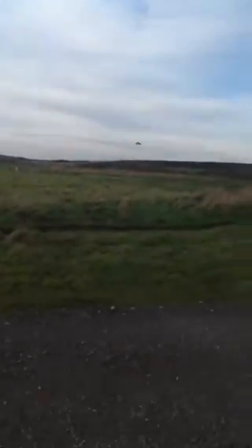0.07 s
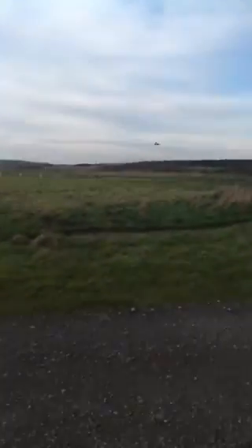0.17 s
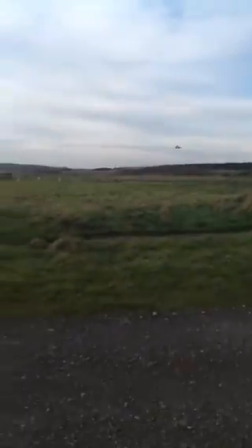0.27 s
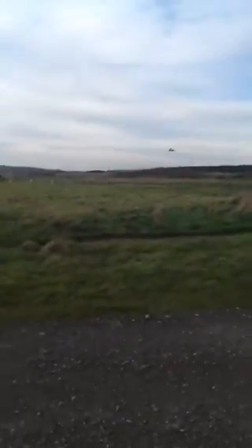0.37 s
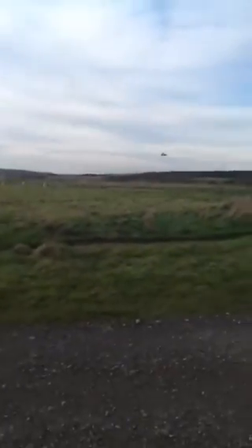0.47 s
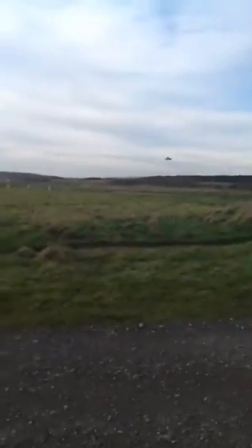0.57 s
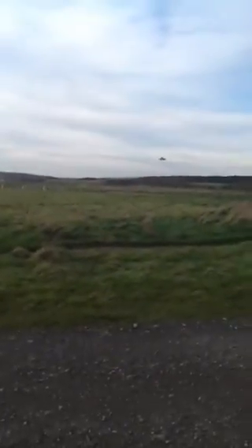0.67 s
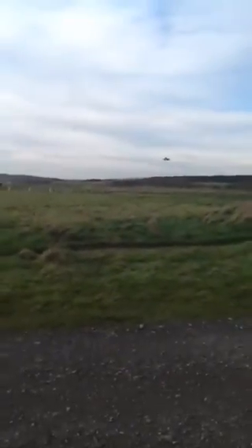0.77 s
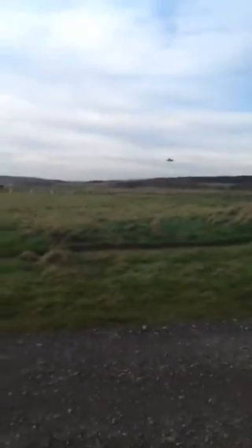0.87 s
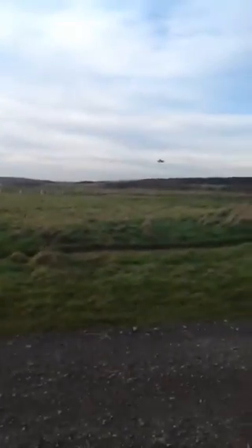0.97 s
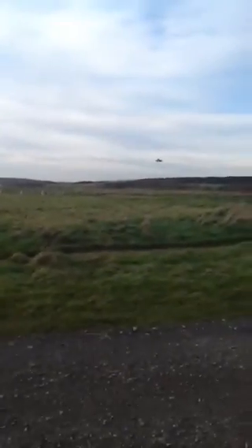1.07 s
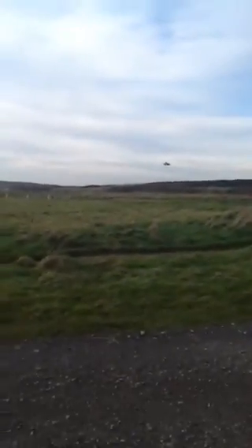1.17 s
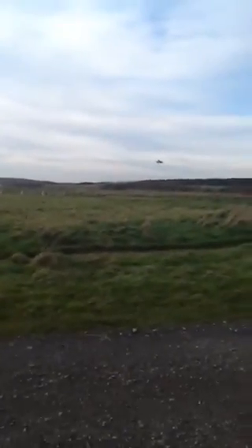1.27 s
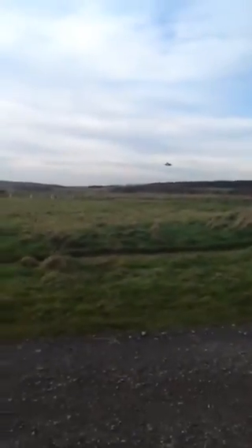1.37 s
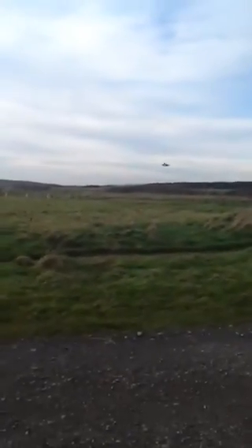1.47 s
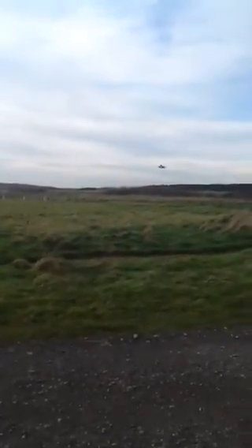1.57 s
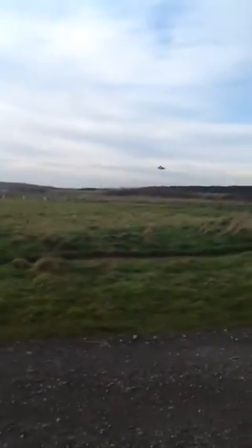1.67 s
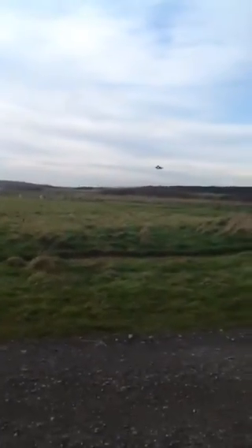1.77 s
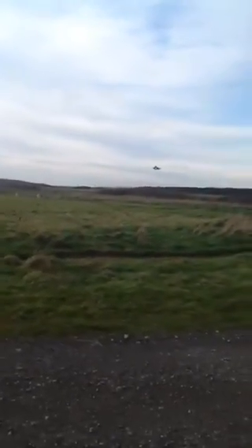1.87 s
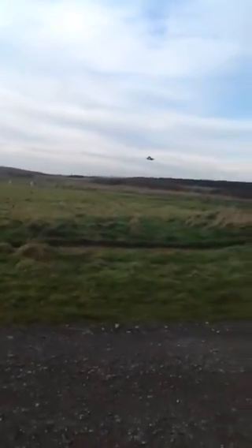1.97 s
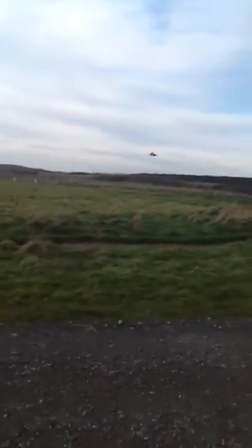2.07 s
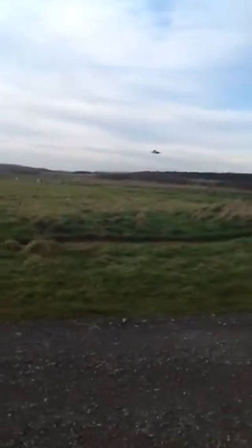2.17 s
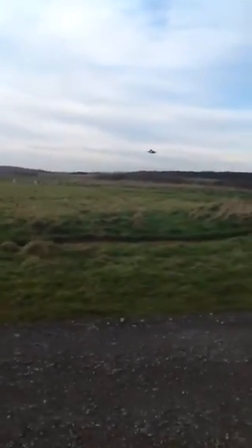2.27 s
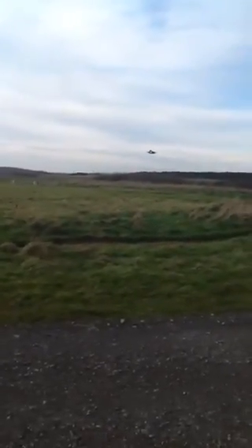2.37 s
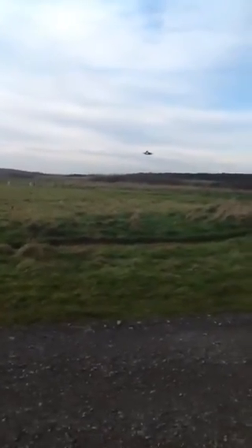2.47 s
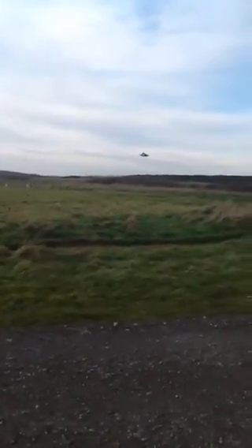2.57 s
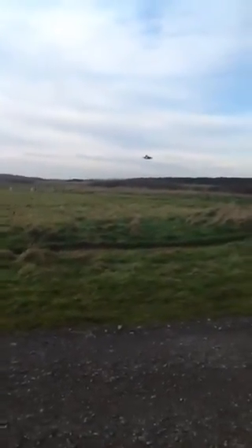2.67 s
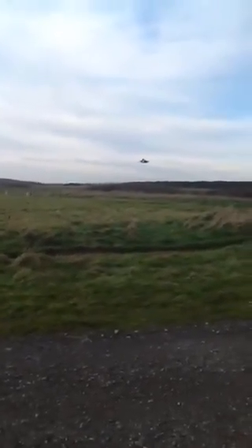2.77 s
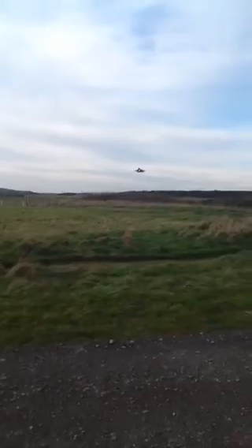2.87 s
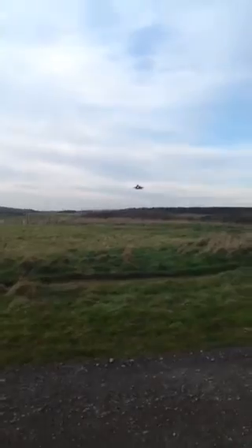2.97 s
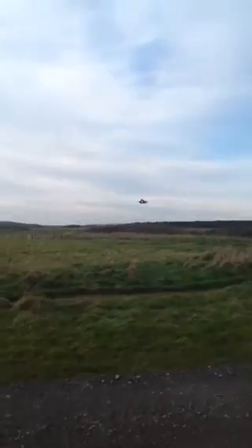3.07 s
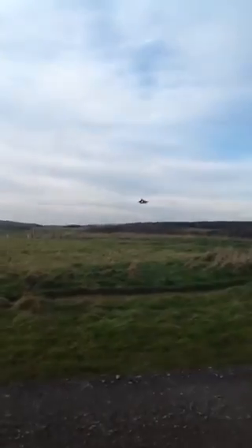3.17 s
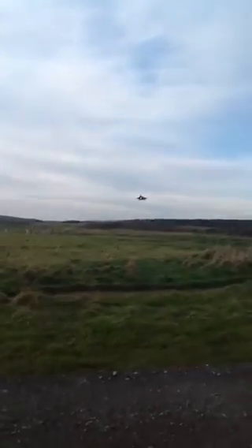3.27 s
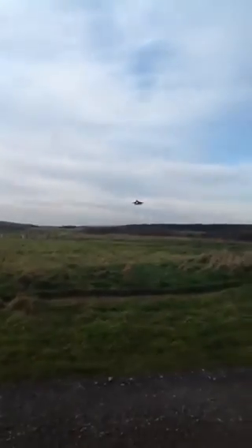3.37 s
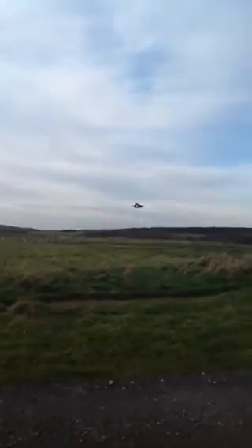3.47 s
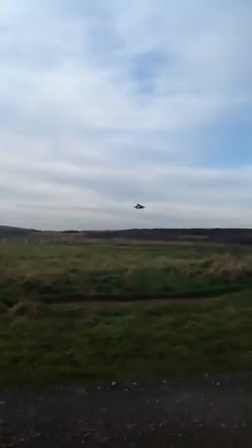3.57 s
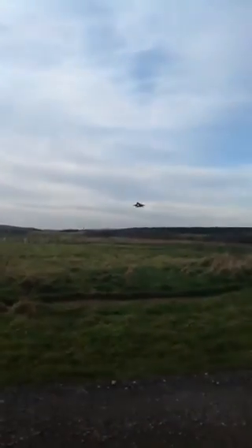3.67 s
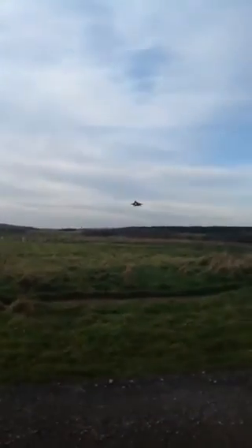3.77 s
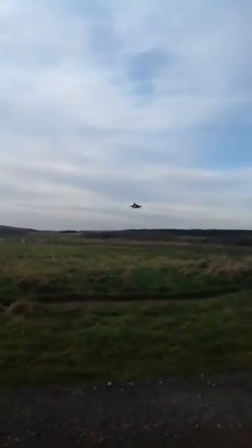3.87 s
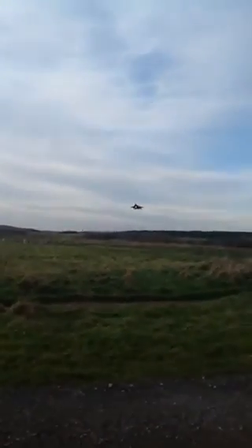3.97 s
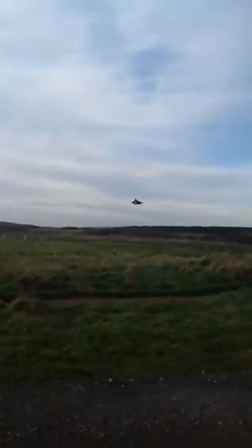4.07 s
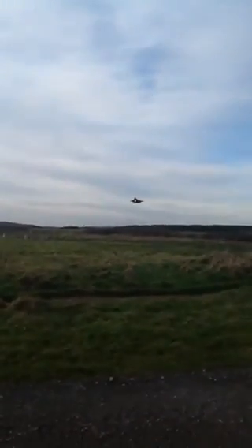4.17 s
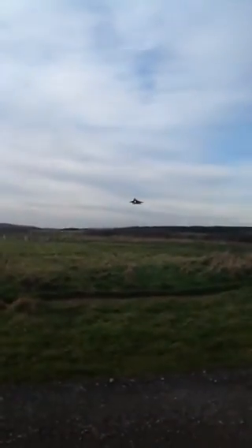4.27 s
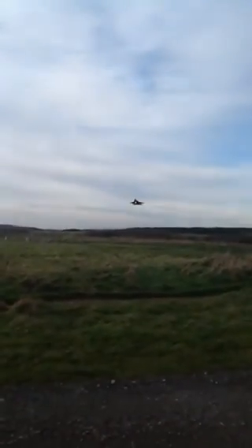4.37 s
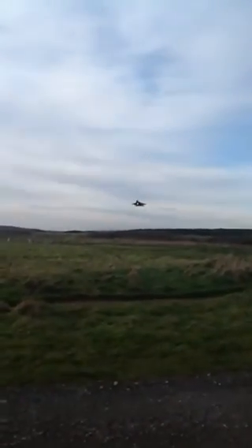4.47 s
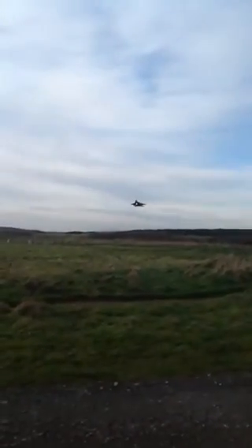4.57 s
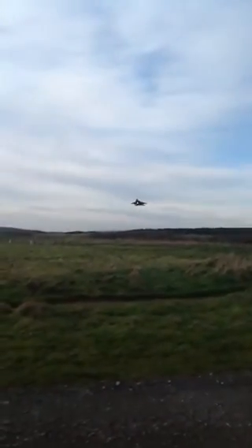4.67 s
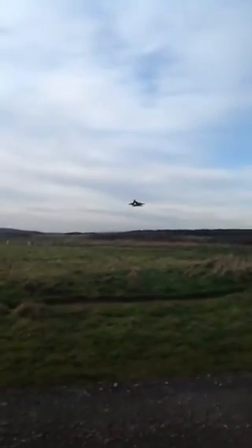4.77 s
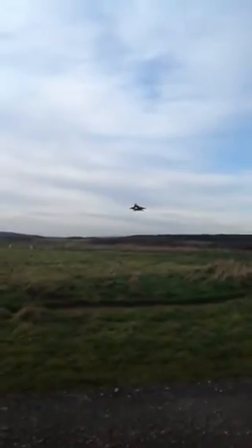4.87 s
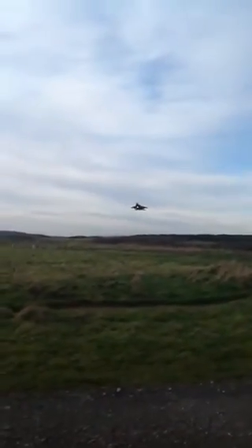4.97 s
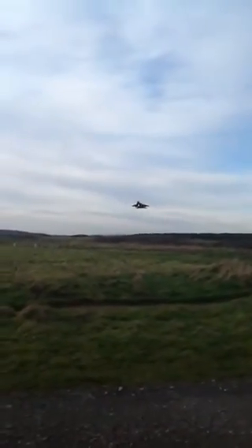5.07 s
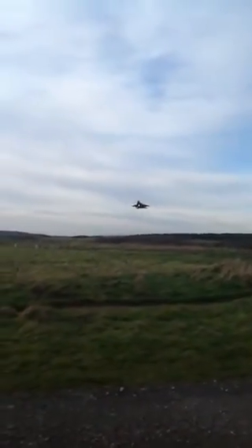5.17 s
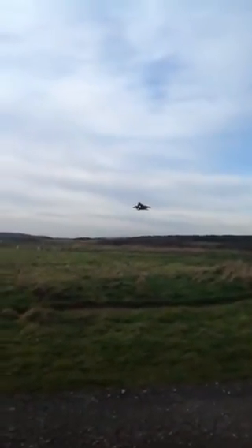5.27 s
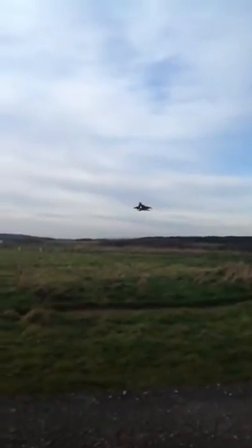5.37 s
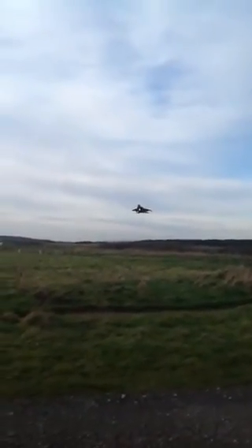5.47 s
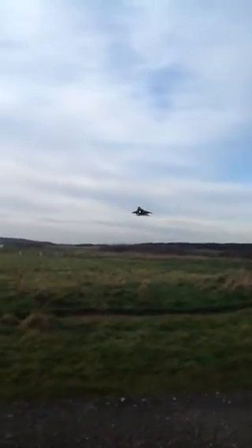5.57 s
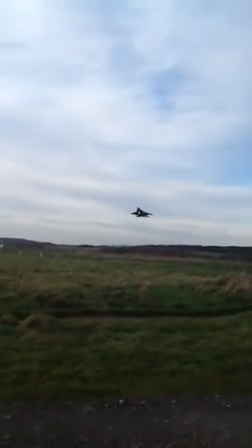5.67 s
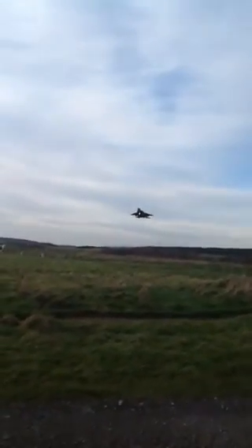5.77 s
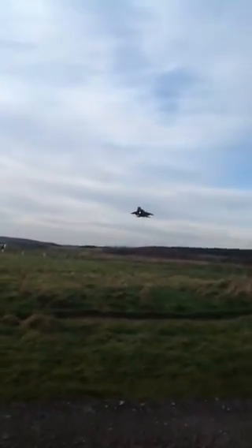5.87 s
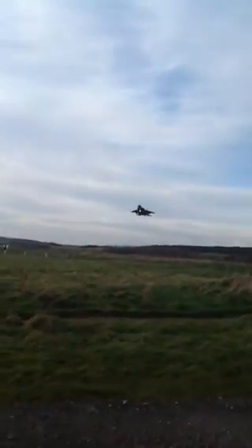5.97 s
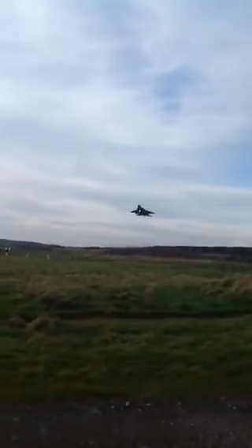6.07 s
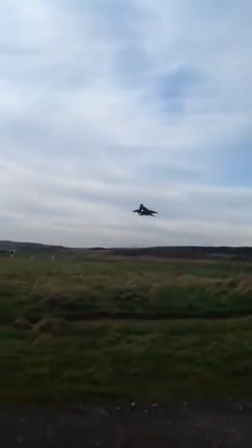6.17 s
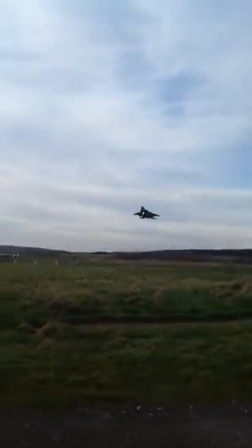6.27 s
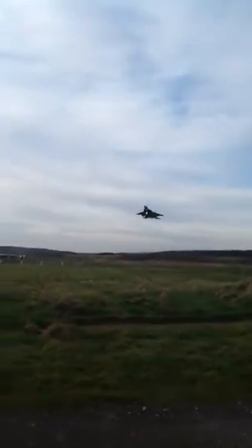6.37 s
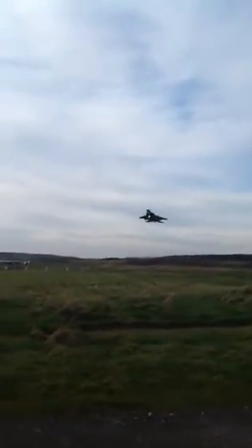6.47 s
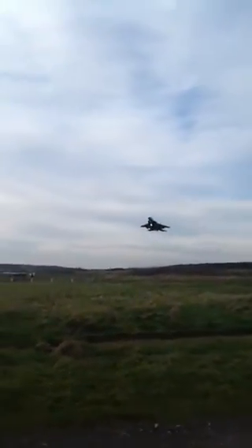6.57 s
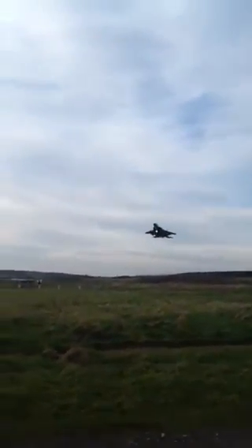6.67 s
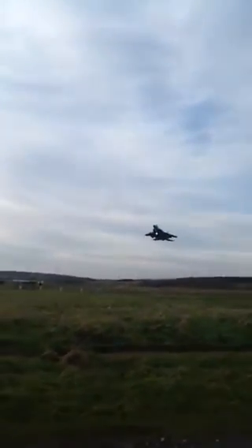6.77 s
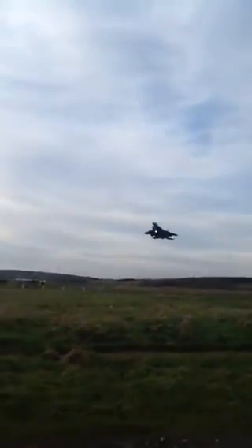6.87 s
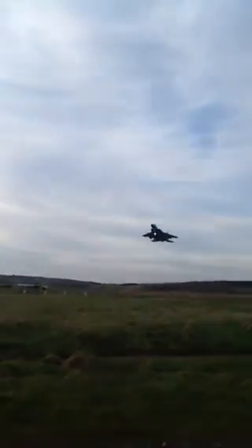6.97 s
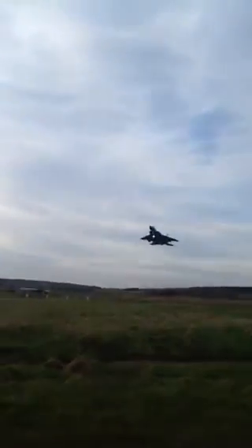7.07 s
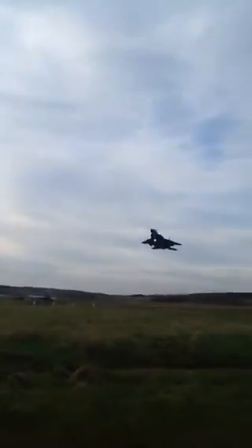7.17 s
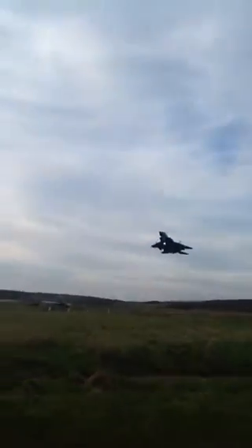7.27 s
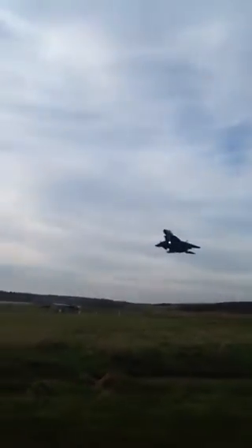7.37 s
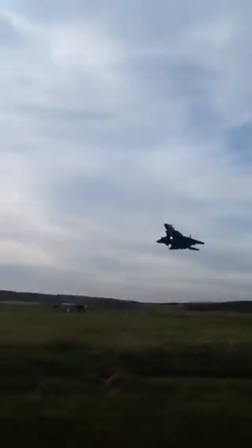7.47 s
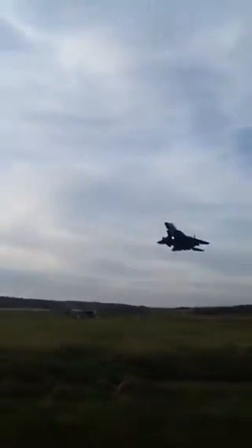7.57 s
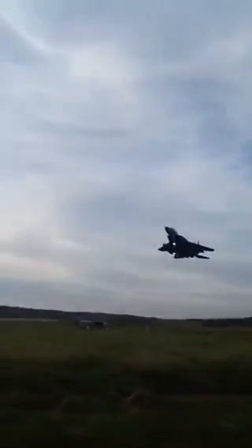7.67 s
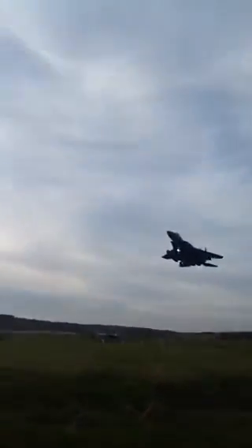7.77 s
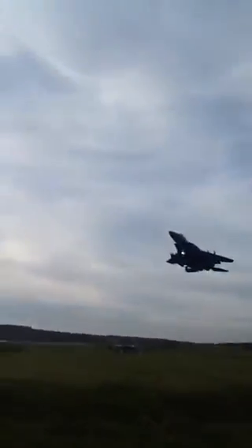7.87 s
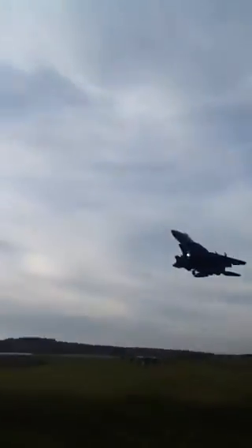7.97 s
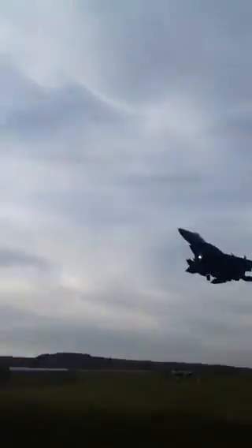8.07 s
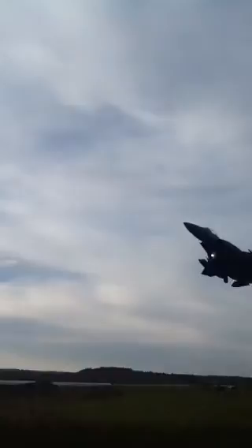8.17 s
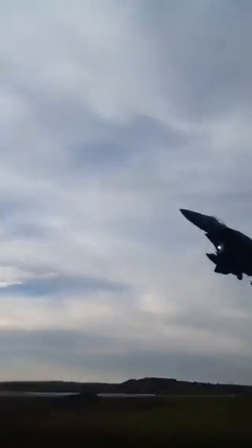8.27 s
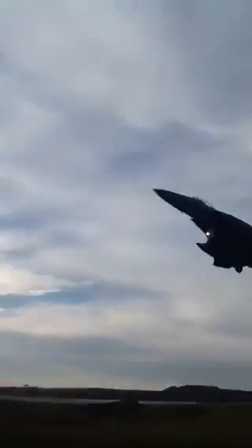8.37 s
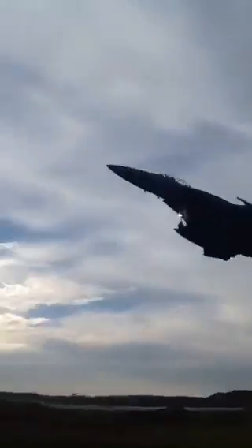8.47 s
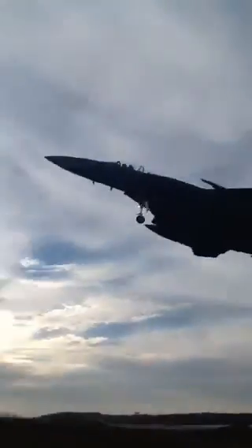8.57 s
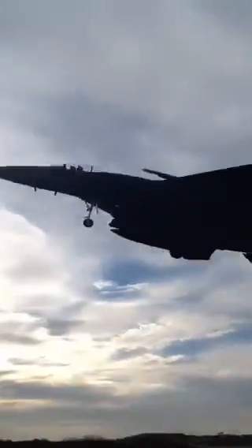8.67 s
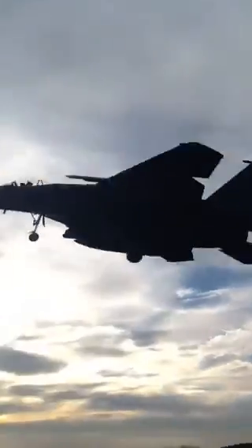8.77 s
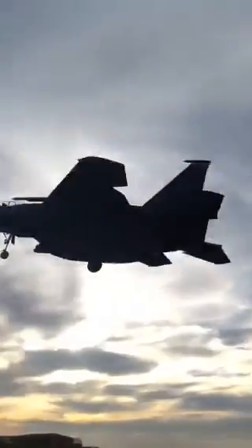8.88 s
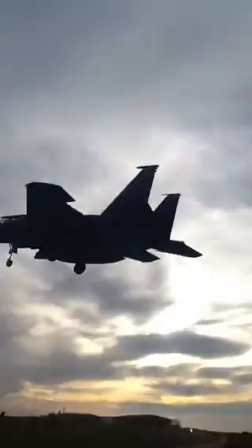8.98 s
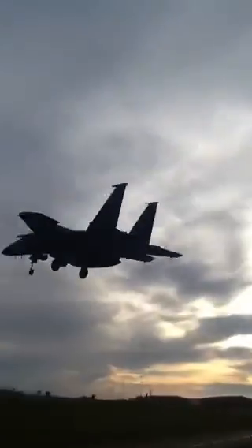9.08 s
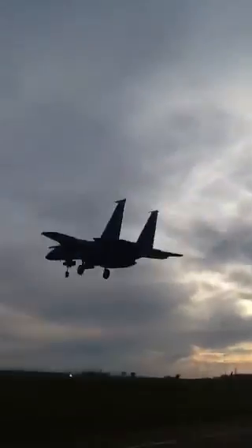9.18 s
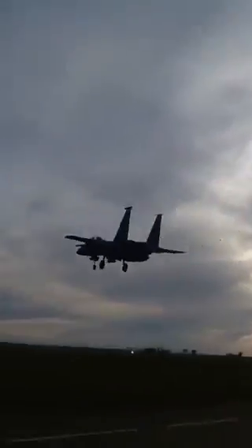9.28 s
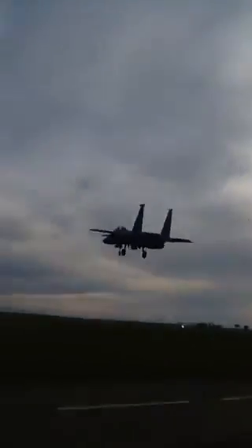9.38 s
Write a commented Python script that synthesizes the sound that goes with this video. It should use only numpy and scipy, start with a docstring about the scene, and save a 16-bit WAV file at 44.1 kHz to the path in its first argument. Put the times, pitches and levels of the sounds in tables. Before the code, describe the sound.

From the start, gusty wind buffets a phone microphone in an open field with irregular low thumps and puffs, strongest in the first three seconds. Underneath, a distant fighter jet makes a faint hiss and thin, high tones that flicker in and out. At about 4 seconds its roar begins to swell, fluttering unevenly, with a high fan whine on top. From 6 seconds the whine grows piercing and climbs slightly, and brief howls rise out of the noise. The roar surges at 7 seconds and stays loud, getting brighter with a faint sweeping, hollow colour, while the wind dies away before 8 seconds. Around 8.5 to 9 seconds the jet passes just overhead: the whine drops away into a broad hissing rush with quick falling howls. A deep exhaust rumble then dominates until the end, at about 9.5 seconds.

```python
"""Low jet over a windy field

A twin-engine jet comes in low and passes just above a phone held in a gusty wind.
From afar its compressor tones twinkle over a faint hiss; then fan whine and roar swell, and the
exhaust rumbles after. Wind buffets the single microphone with low thumps."""
import sys
import numpy as np
from scipy import signal
from scipy.fft import rfft, irfft, next_fast_len
from scipy.io import wavfile
from scipy.ndimage import uniform_filter1d, minimum_filter1d

SR = 44100
rng = np.random.default_rng(int(sys.argv[2]) if len(sys.argv) > 2 else 0)


def dump(signal):
    """Clip the signal to [-1, 1] and save it as 16-bit WAV at the path in sys.argv[1]."""
    limited = np.clip(np.atleast_2d(signal).T, -1, 1)
    pcm = np.round(limited * 32767).astype(np.int16)
    wavfile.write(sys.argv[1], SR, pcm)


N = 415848
TIME = np.arange(N) / SR
FRAME, HOP = 1024, 256


def jet():
    """The fly-over: roar, fan whine and howls in one noise, fluttering in turbulent air."""
    hz, times = grid()
    ahead = np.interp(times, (8.5, 8.8), [1, 0])  # 1 while the intakes face the phone
    roar_db, hiss_db, whine_db = roar(hz, times, ahead)
    roar_db = roar_db + phone_colour(hz) + ground_echo(hz, times)
    power = undb(roar_db) ** 2 + fan_whine(hz, times, ahead, whine_db, hiss_db) + howls(hz, times)
    fade_in_db = -30 * np.clip((4.3 - times) / 0.5, 0, 1)
    return shaped(10 * np.log10(power) + fade_in_db + 0.9 * patches(8, 0.12) + 1.1 * patches(18, 1.5))


# Fader rides for the near jet's three bands: (time [s], roar [dB], rush [dB], whine [dB])
JET_LEVELS = [(4.2, -35, -55, -31.5), (4.24, -49, -41, -42), (4.55, -31, -32, -38),
              (5.12, -26.5, -28.5, -29.5), (5.58, -39, -35.5, -33.5), (6.11, -42, -32, -28),
              (6.33, -30, -28.5, -23), (6.7, -31, -25, -20.5), (7.04, -13, -23, -18.5),
              (7.07, -17, -31, -23), (7.11, -17, -24, -18.5), (7.27, -23, -27, -16.5),
              (7.33, -22, -28, -24), (7.43, -22, -28, -25), (7.48, -14.5, -25.5, -26.5),
              (7.58, -18, -26, -15.5), (7.67, -20.5, -26.5, -20), (7.71, -16.5, -22, -24.5),
              (7.88, -22, -27, -21.5), (8.0, -17.5, -25, -18), (8.06, -21.5, -24, -20),
              (8.38, -17, -24.5, -19), (8.64, -15.5, -20, -24.5), (8.68, -17, -16.5, -24),
              (8.83, -16.5, -19, -24), (8.98, -15.5, -16.5, -22.5), (9.2, -20.5, -34, -34.5),
              (9.28, -23, -23, -31), (9.4, -21, -30.5, -38.5), (9.43, -17, -27, -34)]
# The exhaust rumble grows as the nozzles swing into view: (time [s], level [dB])
EXHAUST_RUMBLE = [(4, -49.5), (6.3, -38), (7.0, -26.5), (7.5, -32.5), (7.95, -19), (8.5, -26.5),
                  (8.85, -19), (9.22, -14.5), (9.43, -14.5)]


def roar(hz, times, ahead):
    """Broad roar that brightens as the air path shortens: its spectrum, hiss and whine levels in dB."""
    cues, *levels = np.transpose(JET_LEVELS)
    body, rush, whine = (np.interp(times, cues, level) for level in levels)
    km = distance_km(times)
    hiss_loss, top_loss, edge_loss = 101, 148, 60  # dB per km, each on top of the last
    hiss = whine - hiss_loss * km - 6 * ahead + 2 * (1 - ahead)
    top = hiss - top_loss * km + 0.5
    top += 0.2 * (whine - uniform_filter1d(whine, size=120))  # clear moments of air lift the top more
    bands = (curve(times, EXHAUST_RUMBLE), body, rush, hiss, top)
    widths_hz = (220, 850, 1600, 1500, 3500)
    rumble, body, rush, hiss, top = (db - 10 * np.log10(width) for db, width in zip(bands, widths_hz))
    eq = {40: rumble - 55, 90: rumble - 27, 150: rumble - 5, 210: rumble,  # Hz: dB per Hz
          720: body, 1300: 0.44 * body + 0.6 * rush + 3.5,
          2470: rush, 3600: 0.83 * rush + 0.15 * hiss - 1.5,
          6750: hiss, 10200: 0.4 * hiss + 0.58 * top + 1.2,
          13000: top, 15500: top - 4 - edge_loss * km}
    knots = np.log(list(eq))
    spectra = [np.interp(np.log(hz[:, 0]), knots, moment) for moment in zip(*eq.values())]
    return np.transpose(spectra), hiss, whine


# The whine climbs as the throttle opens: (time [s], pitch [Hz])
FAN_PITCH = [(5.6, 4540), (6.4, 4430), (7.0, 4650), (7.6, 4746), (8.3, 4840)]


def fan_whine(hz, times, ahead, whine_db, hiss_db):
    """Power of the fan's pointed peak and rough octave; the intakes beam both forward."""
    centre = curve(times, FAN_PITCH) * (1 + 0.015 * walk(6, len(times), SR / HOP))
    spread = np.interp(times, [5.5, 8.3], [0.077, 0.073])  # share of the centre
    beam_db = -30 * (1 - ahead) ** 2
    peak_db = whine_db + 1 - 10 * np.log10(2 * spread * centre) + beam_db
    peak = undb(peak_db) ** 2 * np.exp(-(np.abs(np.log(hz / centre)) / spread) ** 1.144)
    octave_db = hiss_db + 3 - 19 * distance_km(times) + beam_db  # crosses the same air as the hiss
    return peak + undb(octave_db) ** 2 * bell(np.log(hz / centre / 1.956), 0.059)


# Howls in the roar: (centre [s], half-length [s], pitch [Hz], fall [Hz/s], width [Hz], level [dB])
HOWLS = [(4.45, 0.12, 1600, -3000, 200, -35), (6.3, 0.13, 4650, -100, 70, -30),
         (6.4, 0.18, 1410, -200, 100, -30.5), (6.45, 0.26, 2600, -150, 120, -33),
         (7.155, .1, 2740, 305, 80, -29), (7.5, 0.37, 601, 35, 60, -29),
         (8.12, 0.061, 960, -400, 200, -21.5), (8.676, 0.047, 1010, 900, 60.3, -14),
         (8.727, 0.057, 1500, 498, 500, -14), (8.807, 0.036, 3020, 1497, 90, -19.5),
         (8.88, 0.069, 2220, 1500, 90, -21), (9.24, 0.065, 219, 20, 34.3, -17)]


def howls(hz, times):
    """Power of narrow bands that swell out of the roar and glide, falling as the jet passes overhead."""
    power = 0
    for at, length, pitch, fall, width, db in HOWLS:
        glide = pitch - fall * (times - at)
        power += undb(db) ** 2 / (2 * width) * bell(times - at, length) * bell(hz - glide, width)
    return power


# Bell EQs of the phone's body and microphone: (centre [Hz], width [Hz], gain [dB])
PHONE_COLOUR = [(630, 40, 4), (1600, 47, 2.5), (1930, 150, -2.5), (2130, 51, 3), (2620, 77, 3),
                (2820, 360, -3)]


def phone_colour(hz):
    """Fixed peaks and dips of the phone's body and microphone colour the roar, in dB."""
    return sum(db * bell(hz - centre, width) for centre, width, db in PHONE_COLOUR)


# The echo comes later as the jet climbs in the view: (time [s], first comb peak [Hz])
GROUND_COMB = [(4, 1390), (6.3, 970), (7, 570), (7.8, 586), (8.3, 390), (8.7, 243), (9.43, 230)]


def ground_echo(hz, times, share=0.47, blur_hz=900):
    """The bounce off the grass sweeps a comb, in dB; turbulence blurs it towards the treble."""
    echo = share * np.exp(-hz / blur_hz)
    phase = 2 * np.pi * hz / curve(times, GROUND_COMB)
    return 10 * np.log10(1 + 2 * echo * np.cos(phase) / (1 + echo ** 2))


# The main blade tone swells and fades as the air shifts: (time [s], level [dB])
BLADE_TONE_LEVEL = [(0.0, -34.5), (0.27, -36), (0.32, -53), (0.41, -34), (0.7, -41.5), (0.74, -53),
                    (1.04, -40.5), (1.15, -65), (1.37, -39.5), (1.44, -61), (1.51, -39), (1.64, -61),
                    (1.66, -40), (1.82, -37.5), (2.21, -43.5), (2.31, -32), (2.79, -44.5), (2.93, -52),
                    (3.03, -45.5), (3.32, -37), (3.46, -63), (3.48, -43), (3.87, -41.5), (3.9, -59),
                    (4.11, -38.5), (4.3, -58), (4.49, -37.5), (4.66, -52), (5.09, -30.5), (5.62, -36.5),
                    (5.75, -31), (6.15, -30)]
# Side tones: (pitch [Hz], starting level against the far hiss [dB])
SIDE_TONES = [(3752, -24), (4097, -14), (5599, -6), (5975, -13), (6320, -10), (6670, -22), (7472, -27),
              (7822, -25), (8199, -26), (8549, -26), (8893, -24)]
# Tones smeared by turbulence into narrow noise:
# (pitch [Hz], width [Hz], starting level over the far hiss [dB], swell [dB], fade [dB/s])
SMEARED_TONES = [(2069, 40, 11, 1, 0.45), (3170, 92, 1.5, 1.5, 0)]


def compressor_tones(blade_hz=4446.5, twinkle_db=3.2):
    """Distant blade tones twinkle through the air, then fade under the roar."""
    hiss_db = curve(TIME, FAR_HISS_LEVEL)
    fade_db = -30 * np.clip((TIME - 6.05) / 0.5, 0, 1)
    cues, blade_db = np.transpose(BLADE_TONE_LEVEL)
    out = np.interp(TIME, cues, undb(blade_db)) * undb(2.33 * walk(35) + fade_db) * tone(blade_hz)
    nearing_db = 4 * np.maximum(TIME - 4, 0)
    for pitch, db in SIDE_TONES:
        out += undb(hiss_db + db + nearing_db + twinkle_db * walk(10) + fade_db) * tone(pitch)
    for pitch, width, db, swell_db, fade_db_s in SMEARED_TONES:
        band = signal.lfilter(*signal.iirpeak(pitch, pitch / width, SR), rng.standard_normal(N))
        waver_db = swell_db * walk(4.06) + 2.5 * walk(13)
        out += band / band.std() * undb(hiss_db + db - fade_db_s * TIME + fade_db + waver_db)
    return out


# EQ of the far hiss: (frequency [Hz], gain [dB])
FAR_HISS_EQ = [(250, -16), (500, 2), (1000, 0.5), (1600, -1.5), (2600, -2), (4000, -3), (5500, -7.5),
               (7000, -16), (10000, -31), (15500, -57)]
# Its fader ride, dipping and creeping back: (time [s], level [dB])
FAR_HISS_LEVEL = [(0, -47), (1.1, -49), (1.3, -50.5), (2.1, -48), (2.78, -47.5), (2.88, -52.5),
                  (4.2, -49.5), (4.5, -52)]


def far_hiss():
    """Thin, wavering hiss of the distant engines, with one faint whistle arching through it."""
    hz, times = grid()
    hiss_db = eq_db(hz, FAR_HISS_EQ) - 24 + curve(times, FAR_HISS_LEVEL) + 0.7 * patches(8, 0.5)
    from_crest = times - 0.72
    arch_hz, width_hz = 3280 - 1200 * from_crest ** 2, 90
    whistle = undb(-44) ** 2 / (2.5 * width_hz) * bell(from_crest, 0.2) * bell(hz - arch_hz, width_hz)
    return shaped(10 * np.log10(undb(hiss_db) ** 2 + whistle))


# Puffs on the microphone: (start [s], length [s], level [dB])
WIND_PUFFS = [(0.274, 0.058, -29), (0.352, 0.075, -20), (0.579, 0.13, -18.5), (0.833, 0.052, -23),
              (0.879, 0.082, -24.5), (1.01, 0.04, -29), (1.104, 0.19, -22), (1.328, 0.021, -32),
              (1.423, 0.036, -33), (1.685, 0.093, -28.5), (1.959, 0.14, -19), (2.147, 0.076, -28),
              (2.298, 0.117, -30.5), (2.485, 0.055, -26.5), (2.73, 0.05, -27), (2.827, 0.06, -21),
              (3.061, 0.036, -24.5), (3.24, 0.036, -29.5), (3.495, 0.12, -25), (3.714, 0.054, -24.5),
              (4.001, 0.2, -27), (4.332, 0.021, -33.5), (4.55, 0.037, -24), (4.938, 0.068, -23.5),
              (5.071, 0.075, -29), (5.161, 0.019, -27), (5.31, 0.036, -27), (5.43, 0.059, -27),
              (5.794, 0.062, -30.5), (6.102, 0.066, -25.5), (6.207, 0.092, -27), (6.378, 0.024, -30),
              (6.599, 0.035, -23.5), (6.725, 0.023, -26.5), (6.89, 0.057, -31.5), (7.045, 0.052, -34),
              (7.12, 0.045, -31)]
# Bass-heavy EQ of the wind: (frequency [Hz], relative gain [dB])
WIND_EQ = [(15, -70), (25, -33), (54, -17.5), (92, -8), (150, 4), (243, -5), (563, -16.5), (649, -22),
           (1800, -39.5), (2340, -73), (3960, -120)]


def wind(breeze_db=-35.5, lumpy_db=4, rise_s=0.01, fall_s=0.056):
    """Eddies press on the microphone port: a lumpy low breeze with puffs, gone before the jet passes."""
    times = np.arange(N // 64 + 1) * 64 / SR
    power = undb(breeze_db + 2.5 * walk(6, len(times), SR / 64)) ** 2
    for start, length, db in WIND_PUFFS:
        age = times - start
        attack = np.minimum(age / rise_s, 0)
        decay = np.maximum(age, 0) / length
        release = np.maximum(age - length, 0) / fall_s
        power += undb(db) ** 2 * np.exp(attack - decay - release)
    fade_db = -40 * np.clip((TIME - 7.6) / 0.26, 0, 1)
    pressure = rng.standard_normal(N) * np.interp(TIME, times, np.sqrt(power))
    return coloured(pressure * undb(fade_db + lumpy_db * walk(60)), WIND_EQ)


# Hard hits of wind: (start [s], peak before trim [dB], snap against thump [dB], time constant [s])
WIND_BUFFETS = [(0.268, -17, -21, 0.0042), (0.301, -10.5, -27, 0.0052), (0.359, -4.5, -21, 0.0053),
                (0.582, -16, -26, 0.0039), (0.613, -9.5, -25, 0.0068), (0.804, -3.5, -17, 0.0056),
                (0.843, -7.5, -17, 0.0034), (0.888, -6, -10.5, 0.0036), (0.927, -10, -17, 0.0042),
                (0.952, -15, -11, 0.0078), (1.019, -8, -15, 0.003), (1.032, -3.5, -19, 0.0018),
                (1.101, -13, -1, 0.005), (1.169, -11, -20, 0.0052), (1.2, -5, -24, 0.005),
                (1.225, -15, -14, 0.01), (1.29, -9.5, -4, 0.0058), (1.408, -29, -12, 0.0055),
                (1.731, -11, -14, 0.0066), (2.006, -8, -10, 0.01), (2.022, 0, -36, 0.0034),
                (2.279, -10.5, -31, 0.004), (2.329, -16, -31, 0.008), (2.811, -2.5, -6, 0.0056),
                (2.872, -34, -13, 0.0041), (3.065, -10.5, -15, 0.0035), (3.18, -15.5, -33, 0.004),
                (3.509, -32, -18, 0.003), (3.547, -4.5, -20, 0.0025), (3.726, -17.5, -27, 0.0088),
                (4.051, -11.5, -31, 0.0036), (4.317, -10.5, -29, 0.0024), (4.955, -11, -2, 0.0035),
                (5.159, -17, -17, 0.0047), (5.443, -10.5, -12, 0.0029), (5.472, -10.5, -9.5, 0.0048),
                (5.794, -20, -13, 0.0041), (6.134, -14.5, -20, 0.011), (6.385, -15.5, -11, 0.0044)]


def buffets(trim_db=-1.5):
    """Single eddies hit the port: each a low thump with a shorter, brighter snap."""
    out = np.zeros(N)
    for start, peak_db, snap_db, length in WIND_BUFFETS:
        thump = burst(length, (110, 340))
        snap = undb(snap_db) * burst(0.67 * length, (450, 1300))
        at = int(start * SR)
        out[at:at + len(thump)] += undb(peak_db + trim_db) * (thump + snap)
    return out


def burst(length, band_hz):
    """A quick push of band-passed noise, peak 1."""
    age = np.arange(SR // 12) / SR / length
    push = rng.standard_normal(len(age)) * age * np.exp(-age)
    band = signal.sosfilt(signal.butter(3, band_hz, "band", fs=SR, output="sos"), push)
    return band / np.abs(band).max()


def distance_km(times, speed_m_s=59, overhead_s=9.16, closest_m=23):
    """Distance from the phone to the jet on its straight path."""
    return np.hypot(speed_m_s * (times - overhead_s), closest_m) / 1000


def undb(db):
    """Decibels to amplitude."""
    return 10 ** (np.asarray(db) / 20)


def bell(offset, width):
    """Gaussian bump, peak 1."""
    return np.exp(-0.5 * (offset / width) ** 2)


def curve(times, table):
    """Straight ramps through (time, value) points."""
    return np.interp(times, *np.transpose(table))


def eq_db(hz, table):
    """Ramps through (frequency, gain) points on a log frequency axis."""
    knots, db = np.transpose(table)
    return np.interp(np.log(hz), np.log(knots), db)


def walk(rate, size=N, per_s=SR):
    """Random levels held 1 / rate s and smoothed twice; spread 1."""
    hold = max(int(per_s / rate), 1)
    steps = np.repeat(rng.standard_normal(size // hold + 1), hold)
    smooth = uniform_filter1d(uniform_filter1d(steps, hold), hold)[:size]
    return smooth / smooth.std()


def tone(hz):
    """A sine with a slight pitch wobble, rms 1."""
    return np.sqrt(2) * np.sin(2 * np.pi * np.cumsum(hz + 2 * walk(12)) / SR)


def grid():
    """Frequencies and times of the short spectra."""
    hz = np.maximum(np.arange(FRAME // 2 + 1) * SR / FRAME, 20)
    return hz[:, None], np.arange(N // HOP + 4) * HOP / SR


def patches(rate, octaves):
    """Turbulent air: levels that waver in time, alike over a stretch of octaves."""
    hz, times = grid()
    rows = np.array([walk(rate, len(times), SR / HOP) for _ in range(int(11 / octaves) + 2)])
    place = np.log2(hz[:, 0] / 20) / octaves
    low = place.astype(int)
    blend = np.pi / 2 * (place - low)[:, None]
    return rows[low] * np.cos(blend) + rows[low + 1] * np.sin(blend)


def shaped(density_db):
    """Noise whose density in dB per Hz follows a frequency-by-time surface."""
    noise = rng.standard_normal(density_db.shape) + 1j * rng.standard_normal(density_db.shape)
    x = signal.istft(noise * undb(density_db), SR, nperseg=FRAME, noverlap=FRAME - HOP)[1][:N]
    unit = signal.istft(noise, SR, nperseg=FRAME, noverlap=FRAME - HOP)[1][:N]
    return x * np.sqrt(SR / 2) / unit.std()


def coloured(x, table):
    """Apply an EQ table, keeping the rms of white noise."""
    size = next_fast_len(N)
    hz = np.maximum(np.arange(size // 2 + 1) * SR / size, 1)
    gain = undb(eq_db(hz, table))
    return irfft(rfft(x, size) * gain / np.sqrt(np.mean(gain ** 2)), size)[:N]


def scene():
    """Wind, jet and faint self-noise on one microphone, the same in both channels."""
    mono = wind() + buffets() + far_hiss() + compressor_tones() + jet()
    mono += undb(-75) * rng.standard_normal(N)
    return np.array([mono, mono])


def record(dry, ceiling=0.66):
    """The phone drops the deep bass, a quick limiter holds the peaks, and the top is cut."""
    low_cut = signal.sosfilt(signal.butter(2, 75, "high", fs=SR, output="sos"), dry)
    wanted = np.minimum(ceiling / (np.abs(low_cut) + 1e-9), 1)
    gain = uniform_filter1d(minimum_filter1d(wanted, size=129), size=129)
    return signal.sosfilt(signal.ellip(14, 0.2, 60, 15400, fs=SR, output="sos"), gain * low_cut)


dry = scene()
out = record(dry)
dump(out)
```